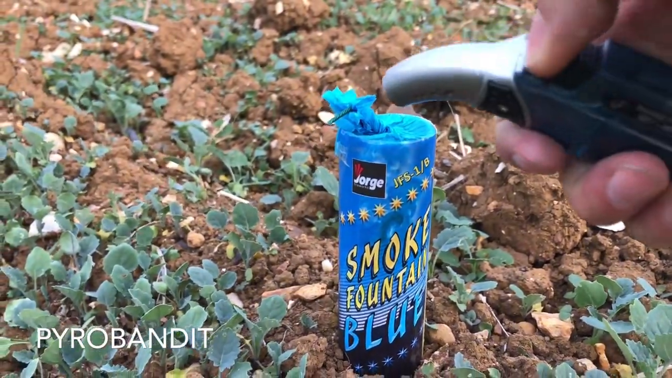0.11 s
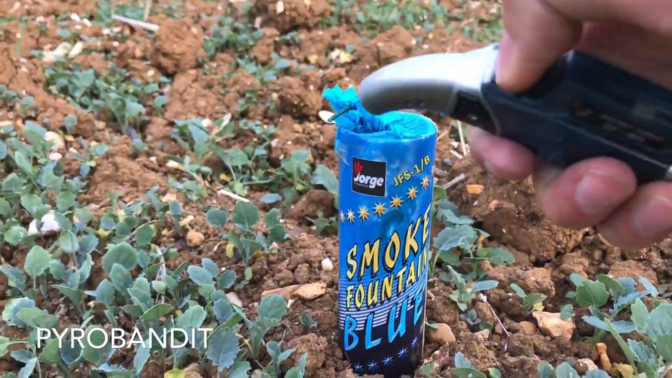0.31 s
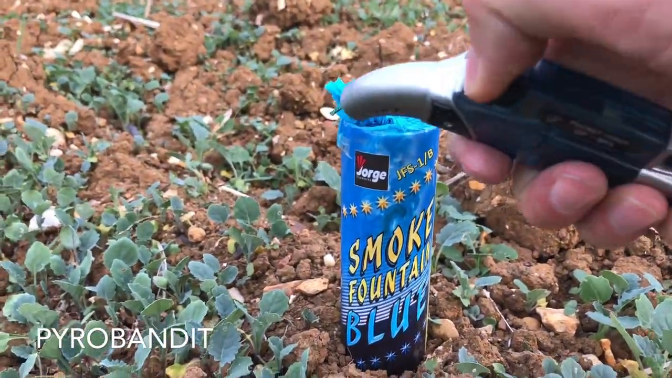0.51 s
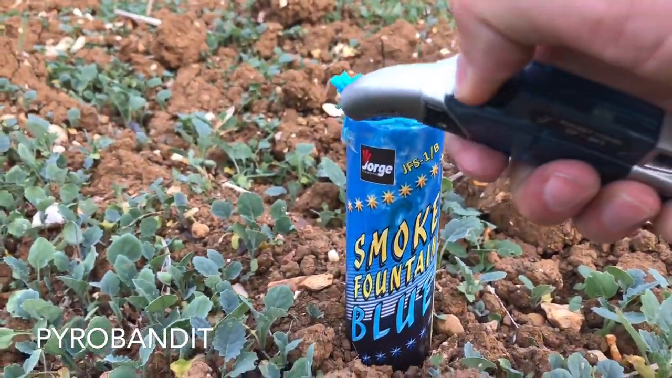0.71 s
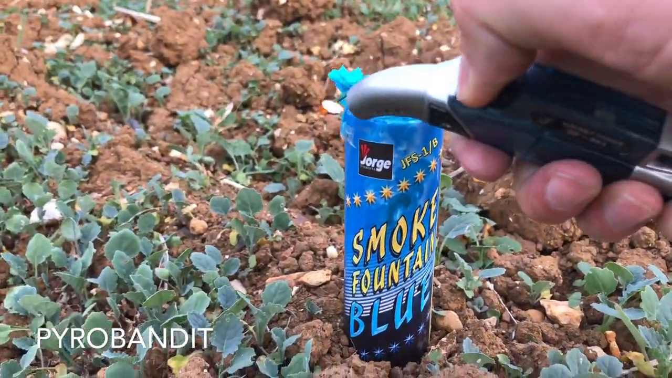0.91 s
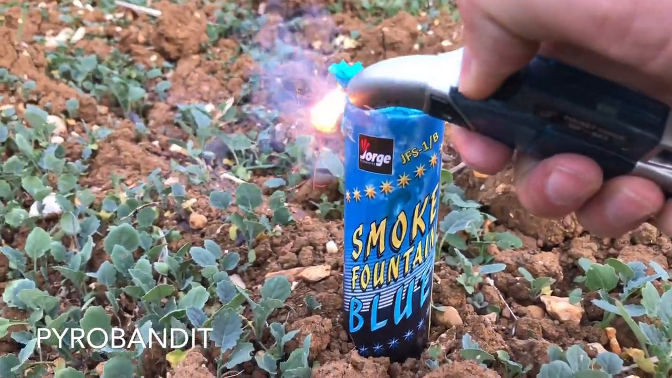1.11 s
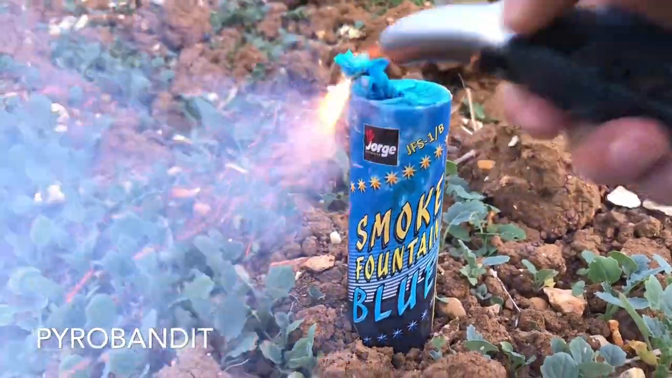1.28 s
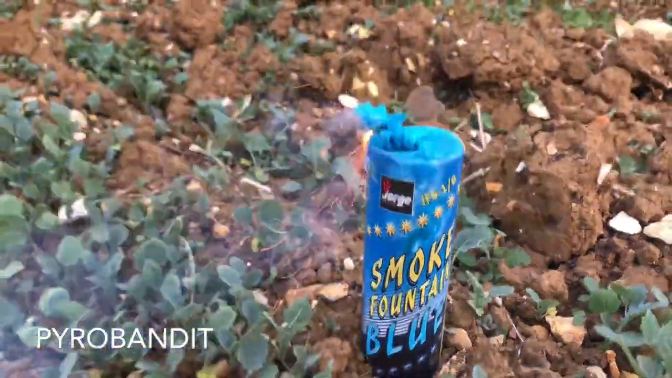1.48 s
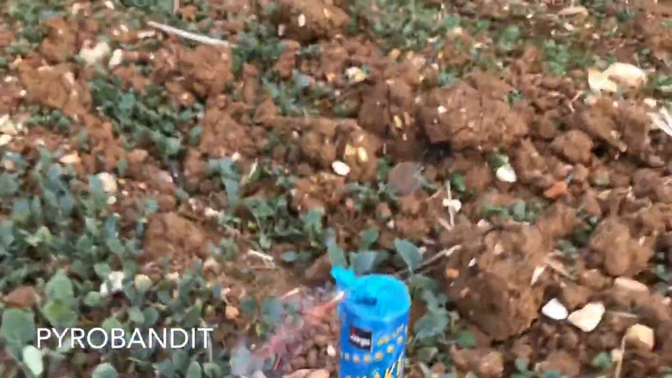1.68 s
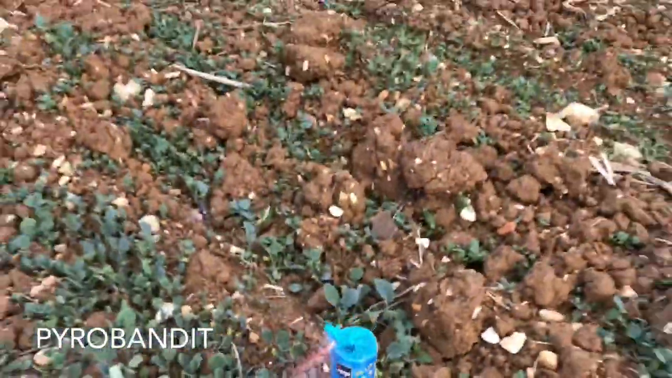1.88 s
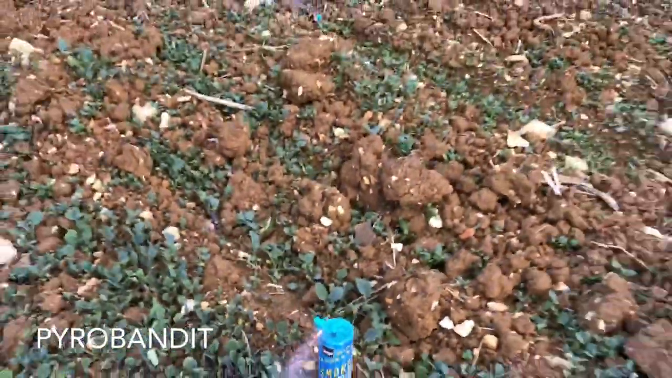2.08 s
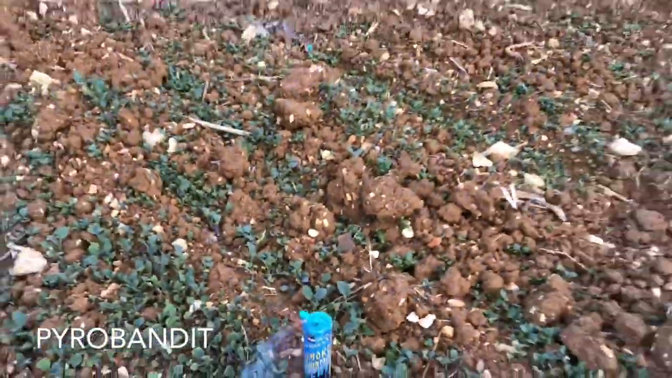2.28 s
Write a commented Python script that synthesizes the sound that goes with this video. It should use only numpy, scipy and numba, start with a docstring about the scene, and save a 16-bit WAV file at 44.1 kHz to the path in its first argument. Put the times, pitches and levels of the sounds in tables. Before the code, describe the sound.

A jet lighter lights a firework fuse, close up in an open field. Soft wind thumps and faint gas hiss lead to a loud, dry igniter snap at 0.25 s. A thin flame hisses with tiny spits; around 1.1 s the fuse catches in a breathy flare. The trigger clicks back at 1.38 s, the flame stops near 1.5 s, and bright fluttering fuse hiss fades until 2.4 s over soft step thumps and wind.

```python
"""Wind and soft steps thump in the bass as gas hisses from a jet lighter; the igniter snaps and the flame blows
at the fuse of a smoke firework in an open field. The fuse catches with a breathy flare, the trigger
clicks back, and the fuse hisses on, fading as the microphone backs away. Clicks are struck damped modes,
burning and wind are turbulence shaped in spectrum and level, spitting is a random train of short noise
bursts, and thumps are band-limited pressure pulses."""
import sys
import numpy as np
from scipy import signal
from scipy.fft import rfft, irfft
from scipy.io import wavfile
from scipy.ndimage import uniform_filter1d, map_coordinates
from numba import njit

SR = 44100
rng = np.random.default_rng(int(sys.argv[2]) if len(sys.argv) > 2 else 0)


def unload_audio(sound):
    """Save the sound as a 16-bit wav file, at the path given as the first command line argument."""
    columns = np.transpose(np.atleast_2d(sound))
    # keep every value between -1 and 1, then stretch to whole-number steps
    steps = np.round(np.clip(columns, -1, 1) * 32767)
    wavfile.write(sys.argv[1], SR, steps.astype(np.int16))


N = 105840  # samples

# All levels of burning are set ahead of the gliding hollows.
# two gliding hollows in the sound of the burning: t/s, lower f/Hz, upper f/Hz, depth of the lower/dB
HOLLOW_PATHS = [(.22, 4600, 11400, 2), (.3, 4600, 11300, 27), (.5, 4716, 11800, 29), (.75, 5270, 12400, 5),
                (1.0, 5500, 12420, 13), (1.14, 5450, 12000, 17), (1.21, 5240, 11700, 9.1),
                (1.25, 5300, 9800, 9.8), (1.42, 5200, 10300, 4.4), (1.6, 4970, 9700, 1.5),
                (1.68, 4670, 9800, 1), (1.72, 4000, 8300, 4), (1.85, 3930, 8260, 7.5),
                (2.4, 4240, 8150, 9.5)]
# unsteadiness of flame and fuse: spread of the level, changes per second
FLICKER_DB, FLICKER_HZ = 1.19, 40.13


def undb(db):
    """Level law: decibels to an amplitude ratio."""
    return 10 ** (np.asarray(db) / 20)


def curve(rows, axis=1):
    """Linear interpolation: one column of a table, joined by straight lines in time."""
    rows = np.array(rows)
    return np.interp(np.arange(N) / SR, rows[:, 0], rows[:, axis])


def colour(x, points):
    """Spectral shaping: weight each frequency, falling 12 dB/octave faster below the first point; rms 1."""
    hz, db = np.array(points).T
    f = np.maximum(np.arange(N // 2 + 1) * SR / N, 1)
    gain = undb(np.interp(np.log(f), np.log(hz), db))
    bass_cut = np.minimum(f / hz[0], 1) ** 2
    y = irfft(rfft(x) * gain * bass_cut, N)
    return y / np.sqrt(np.mean(y ** 2))


def noise(points):
    """Turbulence: Gaussian noise with a given spectrum; rms 1."""
    return colour(rng.standard_normal(N), points)


def walk(rate):
    """Slow random modulation: levels held 1 / rate seconds and smoothed twice; spread near 1."""
    k = int(SR / rate)
    held = np.repeat(rng.standard_normal(N // 100), k)[:N]
    return np.sqrt(2) * uniform_filter1d(uniform_filter1d(held, k), k)


def flicker(level_rows):
    """Amplitude modulation: a level curve with the unsteadiness of burning, as a gain."""
    return undb(curve(level_rows) + FLICKER_DB * walk(FLICKER_HZ))


def gate(on, rise, off, fall):
    """Flow envelope: linear attack, hold, exponential release."""
    t = np.arange(N) / SR
    return np.clip((t - on) / rise, 0, 1) * np.exp(-np.maximum(t - off, 0) / fall)


def add(out, start, x):
    """Superposition: mix a short sound in at a time in seconds."""
    i = max(int(start * SR), 0)
    out[i:i + len(x)] += x[:max(N - i, 0)]


@njit
def svf(x, hz, width):
    """Second-order resonance: a band-pass with moving centre and width, gain 1 at the centre."""
    y, b, l = np.empty(len(x)), 0., 0.
    for i in range(len(x)):
        g, k = np.tan(np.pi * hz[i] / SR), width[i] / hz[i]
        v = (b + g * (x[i] - l)) / (1 + g * (g + k))
        b, l, y[i] = 2 * v - b, l + 2 * g * v, k * v
    return y


def dip(x, hz, depth_db, width):
    """Notch by subtraction: removing part of a band leaves a hollow, whose centre may move."""
    return x - (1 - undb(-depth_db)) * svf(x, hz * np.ones(N), width * np.ones(N))


def roar_dip(x):
    """Fixed notch: a steady narrow hollow in the roar of flame and flare."""
    return dip(x, hz=3230, depth_db=3.5, width=410)


def clicks():
    """Modal impact: each blow cracks and rings the lighter's plastic body, over a faint dull casing knock."""
    # three trigger creaks, igniter snap, small after-tick, trigger release:
    # t/s, peak level ahead of the knock/dB, ring length factor, share of bright crack
    blows = [(0.163, -45, 1.2, 0.16), (0.224, -33.5, 1.2, .2), (0.2358, -40, 1.5, .3),
             (0.2471, -1.2, 1.13, 0.37), (0.2702, -35, 0.89, .6), (1.3751, -13, 1.15, 0.98)]
    # modes of the lighter body: f/Hz, relative level/dB, t60 ahead of the ring length factor/s
    modes = [(1664, 2, 0.0083), (1880, -7.5, 0.0079), (3170, 1, 0.005), (4320, -1, 0.0078),
             (5220, 4.5, 0.0049), (6594, 11, 0.0044), (8420, 0, .004), (9770, -6, 0.0042),
             (11300, 8, 0.0021), (12820, -2, 0.0029)]
    body_cut_hz, crack_cut_hz = 1540, 7000
    crack_s, contact_s = 0.0016, 0.00081  # decay of the crack, time in which the modes are driven
    knock_hz, knock_decay_s, knock_share = 396, 0.00088, 0.039  # share against the peak of the click
    out, t = np.zeros(N), np.arange(SR // 20) / SR
    cut = signal.butter(7, body_cut_hz, "high", fs=SR, output="sos")
    treble = signal.butter(2, crack_cut_hz, "high", fs=SR, output="sos")
    knock = knock_share * np.sin(2 * np.pi * knock_hz * t) * np.exp(-t / knock_decay_s)
    contact = 1 - np.exp(-(t / contact_s) ** 2)
    for start, db, ring, bright in blows:
        body = np.zeros(len(t))
        for hz, mode_db, t60 in modes:
            decay = np.exp(-np.log(1000) * t / (t60 * ring))
            body += undb(mode_db) * np.sin(2 * np.pi * hz * t) * decay
        crack = signal.sosfilt(treble, rng.standard_normal(len(t)) * np.exp(-t / crack_s))
        hit = signal.sosfilt(cut, body * contact + bright * crack)
        add(out, start, undb(db) * (hit / np.abs(hit).max() + knock))
    return out


def lighter():
    """Jet turbulence: gas hisses thinly, then burns with resonances that climb with the heat and sink again."""
    # spectrum of the unlit gas: f/Hz, relative level per Hz/dB
    gas_spectrum = [(1000, -32), (4400, -16.5), (6200, -14), (8000, -3), (9400, -9), (10200, -21),
                    (12000, -14), (14000, -12), (15500, -6)]
    # spectrum of the flame's roar: f/Hz, relative level per Hz/dB
    flame_spectrum = [(100, -0.5), (300, 0), (550, -2), (1000, 1), (1600, 1.5), (2600, -0.5), (3200, -5.5),
                      (3850, 0), (4700, -3), (5600, -11.5), (7000, -16.5), (10000, -21), (13200, -17),
                      (16000, -6.5)]
    # thin hiss of the nozzle, before its glide: f/Hz, relative level per Hz/dB
    nozzle_spectrum = [(4600, -2), (5250, 11), (6200, -9), (7500, 3), (8400, 2), (10000, -7.5),
                       (11600, -20), (12400, 1), (13100, -11), (14200, -10), (15500, -8)]
    # jet flame, ahead of its flicker: t/s, level/dB
    jet_level = [(.26, -43), (.42, -41.5), (.55, -43.5), (.75, -42), (.95, -46), (1.08, -45.5), (1.2, -45),
                 (1.37, -35)]
    gas_db, nozzle_db = -52, -14.5  # nozzle against the roar
    lit_s = 0.23
    gas = undb(gas_db) * noise(gas_spectrum) * gate(on=0.082, rise=0.033, off=lit_s, fall=0.04)
    # reading the noise faster raises its resonances in step with the lower hollow
    hollow = curve(HOLLOW_PATHS)
    position = np.cumsum(hollow / hollow[0])
    nozzle = map_coordinates(noise(nozzle_spectrum), [position], order=5, mode="mirror")
    jet = roar_dip(noise(flame_spectrum)) + undb(nozzle_db) * nozzle
    burning = gate(on=lit_s, rise=0.019, off=1.48, fall=0.017)
    return gas + jet * flicker(jet_level) * burning


def spitting():
    """Poisson impulses: tiny pops of uneven size, each a decaying noise burst, as the flame licks the fuse."""
    # spells of spitting: t/s, length/s, level/dB, pops per second
    spells = [(0.256, 0.089, -53.5, 170), (0.406, 0.026, -48, 360), (0.45, 0.043, -51.5, 130),
              (0.52, 0.36, -53, 450), (1.015, 0.04, -49.5, 240), (1.055, 0.12, -46, 1400)]
    # spectrum of the pops: f/Hz, relative level per Hz/dB
    pop_spectrum = [(1500, -24), (4000, 12), (5700, 9), (8500, 3.5), (11000, -5), (16000, -3)]
    scatter_db, pop_decay_s = 3.5, .00025
    out = np.zeros(N)
    for start, length, db, rate in spells:
        sizes = undb(scatter_db * np.clip(rng.standard_normal(N), -2, 2))
        pops = (rng.random(N) < rate / SR) * sizes
        envelope = signal.lfilter([1], [1, -np.exp(-1 / (pop_decay_s * SR))], pops)
        bursts = envelope * rng.standard_normal(N)
        spell = gate(start, 0.0036, start + length, 0.0057)
        out += undb(db) * spell * colour(bursts, pop_spectrum)
    return out


def vent(x):
    """Resonant filtering: narrow resonances of the burning tip each drift and swell independently; rms 1."""
    # resonances of the tip, ahead of drift and sway: f/Hz, level/dB
    resonances = [(4150, -13), (4750, -9.5), (5550, -11), (6700, -12), (7250, -5), (9150, -23), (10450, -5),
                  (11450, -6), (13050, -6), (15350, 0)]
    width_hz, drift = 400, .018  # drift is a share of the centre
    sway_db, changes_hz = 5, 13
    y = x.copy()
    for hz, db in resonances:
        gain = undb(db + sway_db * np.tanh(walk(changes_hz)))
        centre = hz * (1 + drift * walk(changes_hz))
        y += gain * svf(x, centre, np.full(N, float(width_hz)))
    return y / np.sqrt(np.mean(y ** 2))


def fuse():
    """Combustion noise: the tip flares with a breathy roar, then the core burns with a bright, flickering hiss."""
    # flare of the tip, ahead of its flicker: t/s, level/dB
    flare_level = [(1.04, -69), (1.16, -42.5), (1.3, -35), (1.4, -35), (1.52, -36.5), (1.63, -40),
                   (1.8, -46), (2.03, -48), (2.12, -46.5), (2.23, -54), (2.28, -48), (2.4, -58)]
    # spectrum of the flare, ahead of the resonances: f/Hz, relative level per Hz/dB
    flare_spectrum = [(50, -14), (130, 2), (330, 5), (700, -1), (1600, 0.5), (2500, 0), (3250, -7.5),
                      (3950, 2), (4600, -3), (5600, -1), (6600, -1), (7800, -22), (10000, -20),
                      (11500, -10), (15500, -15)]
    # steady burn, ahead of its flicker: t/s, level/dB
    hiss_level = [(1.05, -54), (1.16, -41), (1.22, -47), (1.4, -44), (1.5, -32.5), (1.56, -32.5),
                  (1.645, -35.5), (1.695, -32.5), (1.82, -33), (1.92, -34.5), (2.03, -38.5), (2.09, -36.5),
                  (2.23, -43.5), (2.28, -40), (2.37, -40.5), (2.4, -43.5)]
    # spectrum of the steady burn, ahead of the resonances: f/Hz, relative level per Hz/dB
    hiss_spectrum = [(120, -23), (300, -15), (750, -6), (1300, 0), (2400, 0), (3300, 3.5), (4500, 0),
                     (6800, -1), (9000, 2.5), (11000, -3), (12200, -0.5), (15600, -3)]
    lit_s, catch_s = 0.88, 0.11
    flare = roar_dip(vent(noise(flare_spectrum))) * flicker(flare_level)
    hiss = vent(noise(hiss_spectrum)) * flicker(hiss_level)
    caught = np.clip((np.arange(N) / SR - lit_s) / catch_s, 0, 1)
    return caught * (flare + hiss)


def hollowed(x):
    """Moving notches: two hollows, the upper one shallower, glide through all the burning sounds."""
    lower, upper, db = (curve(HOLLOW_PATHS, axis=k) for k in range(1, 4))
    q, upper_share = 4.7, .5
    x = dip(x, lower, db, lower / q)
    return dip(x, upper, upper_share * db, upper / q)


def thumps():
    """Pressure pulses: soft pushes from gusts and steps ring in the microphone's bass cut."""
    # pushes: t/s, peak level/dB, time constant/s
    pushes = [(0.012, -37, 0.002), (0.082, -36, 0.0016), (0.151, -34, 0.0014), (0.21, -38.5, 0.0055),
              (0.264, -42, 0.0039), (0.294, -38.5, 0.002), (0.55, -42.5, 0.0018), (.697, -41, 0.0051),
              (0.749, -34, 0.0012), (1.643, -36.5, 0.00088), (1.679, -31.5, 0.00079), (1.7, -29.5, 0.00074),
              (1.789, -34.5, 0.0077), (1.867, -33, 0.0021), (1.951, -24, 0.00093), (1.965, -33, 0.0059),
              (2, -35.5, 0.00017), (2.097, -34, 0.0018), (2.145, -35.5, 0.0012), (2.254, -46, 0.0019),
              (2.285, -41, 0.0013)]
    cut_hz, top_hz = 76, 440
    out, t = np.zeros(N), np.arange(SR // 10) / SR
    cut = signal.butter(4, [cut_hz, top_hz], "band", fs=SR, output="sos")
    for start, db, length in pushes:
        # a push and its recoil, which sum to zero
        pulse = (t / length) ** 2 * np.exp(-t / length) * (1 - t / length / 3)
        push = signal.sosfilt(cut, pulse)
        add(out, start - length, undb(db) * push / np.abs(push).max())
    return out


def wind():
    """Flow noise: uneven rumble on the microphone over the faint steady air of the field."""
    # rumble, ahead of its random unevenness: t/s, level/dB
    rumble_level = [(0, -44), (.3, -54), (.42, -67), (.58, -51), (.76, -64), (.84, -61), (1.5, -62),
                    (1.66, -52.5), (1.95, -47), (2.12, -48.5), (2.22, -55.5), (2.4, -61)]
    # spectrum of the rumble: f/Hz, relative level per Hz/dB
    rumble_spectrum = [(20, -62), (40, 6.5), (65, 7), (120, 5.5), (200, -1), (350, -31), (700, -49)]
    # spectrum of the field's air: f/Hz, relative level per Hz/dB
    air_spectrum = [(100, -12), (450, 6.5), (750, 1), (1100, 6.5), (2000, 1.5), (3000, -6.5), (7000, -9),
                    (16000, -37)]
    air_db, uneven_db, changes_hz = -68, 0.51, 24.8
    rumble = noise(rumble_spectrum) * undb(curve(rumble_level) + uneven_db * walk(changes_hz))
    return rumble + undb(air_db) * noise(air_spectrum)


def scene():
    """Superposition: all sources reach one microphone; both channels are alike."""
    burning = hollowed(lighter() + spitting() + fuse())
    mono = clicks() + burning + thumps() + wind()
    return np.array([mono, mono])


def record(dry):
    """Band limiting: the recorder cuts the top steeply."""
    top_hz = 15900
    low_pass = signal.ellip(10, .2, 80, top_hz, fs=SR, output="sos")  # ripple and stop-band depth in dB
    return signal.sosfilt(low_pass, dry)


dry = scene()
out = record(dry)
unload_audio(out)
```